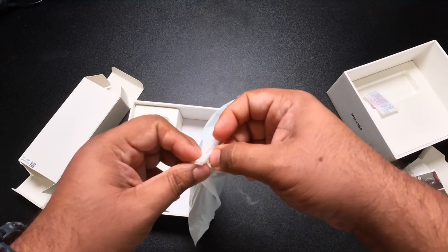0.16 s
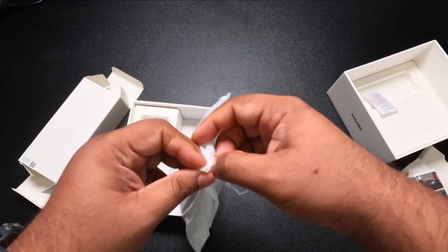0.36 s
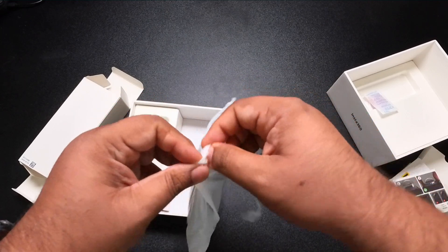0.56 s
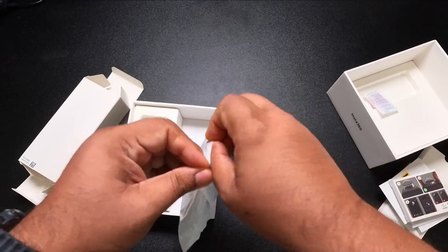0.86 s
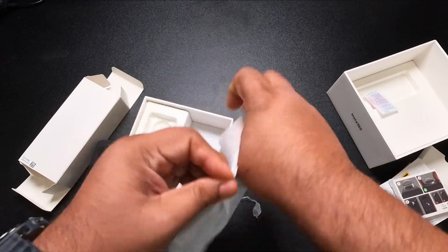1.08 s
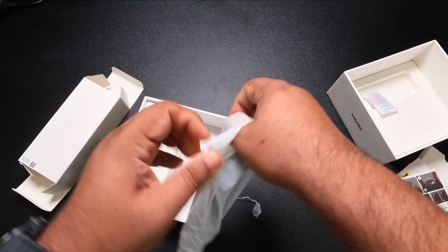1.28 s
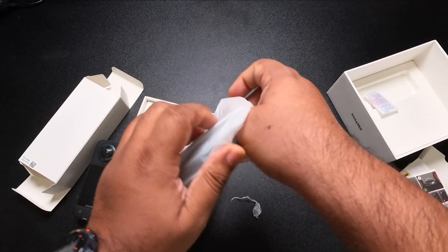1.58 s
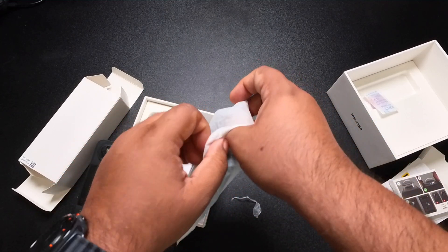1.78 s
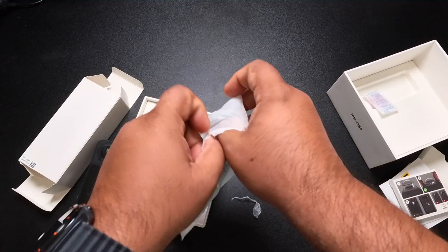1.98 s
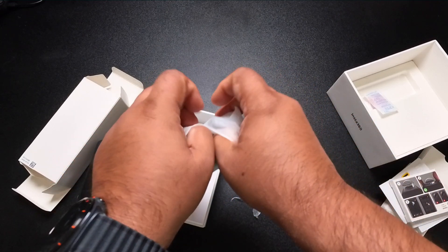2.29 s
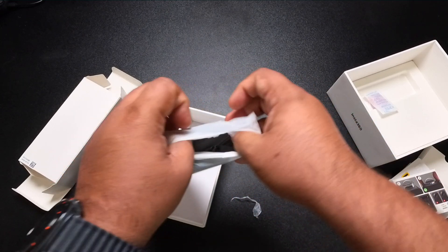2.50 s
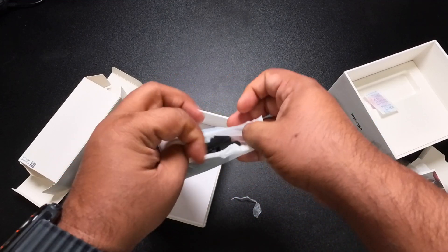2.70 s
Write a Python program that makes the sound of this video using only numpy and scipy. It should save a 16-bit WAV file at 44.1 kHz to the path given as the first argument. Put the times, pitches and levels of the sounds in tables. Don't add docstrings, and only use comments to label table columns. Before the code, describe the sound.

A thin plastic bag crackles softly in irregular picks, rips with a sudden sharp burst, then rustles and snaps as hands pull it open over a desk; close stereo microphones in a quiet room with faint low rumble.

```python
import sys
import numpy as np
from scipy import signal
from scipy.fft import rfft, irfft, next_fast_len
from scipy.io import wavfile

SR = 44100
rng = np.random.default_rng(int(sys.argv[2]) if len(sys.argv) > 2 else 0)


def level_to_linear(level):
    exponent = np.asarray(level, float) / 20
    return 10 ** exponent


def dump(signal):
    limited = np.clip(np.atleast_2d(signal).T, -1, 1)
    pcm = np.round(limited * 32767).astype(np.int16)
    wavfile.write(sys.argv[1], SR, pcm)


N = 125685

# (frequency [Hz], level per Hz [dB])
ROOM_SPECTRUM = [(12, 6.5), (20, 2), (55, -6.5), (80, -13), (129, -10.5), (178, -18.5), (373, -15.5),
                 (677, -31.5), (1500, -19), (1950, -109), (3300, -120)]
# (start [s], length [s], level [dB], pouch fullness [dB], crispness [dB])
FINGER_STROKES = [(0.0, 0.012, -46.5, -17, -4), (0.022, 0.051, -50.5, -17.5, 0.5),
                  (0.081, 0.046, -46.5, -21, -2.5), (0.133, 0.072, -53.5, -15.5, 1),
                  (0.264, 0.03, -54, -24, -4), (0.294, 0.036, -44.5, -15, -1),
                  (0.352, 0.022, -56.5, -8, 2), (0.395, 0.073, -47.5, -14.5, -2.5),
                  (0.456, 0.051, -54, 8.5, -3), (0.486, 0.045, -49.5, -17, -5),
                  (0.546, 0.02, -41, -11.5, -2.5), (0.563, 0.042, -39, -15, -7),
                  (0.635, 0.051, -56, -3, 3), (0.704, 0.026, -46, -20, -2.5),
                  (0.732, 0.042, -41.5, -26, 1), (0.774, 0.027, -46, -23, -2),
                  (0.814, 0.051, -51.5, -33, 3.5), (0.9, 0.05, -49, -32, -6),
                  (0.946, 0.02, -38.5, -18, -7), (0.964, 0.039, -37, -18.5, -2.5),
                  (1.004, 0.12, -40.5, -28.5, -3.5), (1.129, 0.057, -43, -19, -1.5),
                  (1.169, 0.02, -40, -15, -4), (1.19, 0.025, -26, -13.5, -5),
                  (1.214, 0.019, -29, -12, -1.5), (1.225, 0.032, -30.5, -17.5, -5.5),
                  (1.254, 0.066, -40, -10, -5), (1.325, 0.043, -48.5, -11, -9),
                   (1.346, 0.033, -48, -8.5, -6), (1.389, 0.063, -38.5, -15.5, -7.5),
                   (1.431, 0.081, -39.5, -11, 2), (1.508, 0.064, -45, -21, -5),
                   (1.582, 0.061, -48.5, -10, -1), (1.647, 0.044, -42, -19, -4),
                   (1.68, 0.053, -37.5, -15.5, -7), (1.735, 0.047, -43.5, -15, 2.5),
                   (1.785, 0.034, -44, -15, -3), (1.82, 0.043, -41, -20, -4),
                   (1.865, 0.036, -39, -9.5, -2.5), (1.9, 0.021, -41, -10, -7),
                   (1.922, 0.024, -46, -10, -10), (1.947, 0.045, -43.5, -17, -3),
                   (1.995, 0.066, -41.5, -20, -3.5), (2.06, 0.016, -46, -13, -19),
                   (2.074, 0.068, -44.5, -16, -1), (2.14, 0.021, -55.5, -10, 5),
                   (2.165, 0.048, -41, -12.5, -7.5), (2.208, 0.059, -50.5, -15, -7),
                   (2.258, 0.11, -43.5, -11.5, -1.5), (2.34, 0.015, -40, -7, -1),
                   (2.358, 0.088, -42, -12, -5), (2.418, 0.0079, -34, -10.5, -11),
                   (2.44, 0.14, -43, -11.5, -4.5), (2.52, 0.02, -35, -10, -5),
                   (2.551, 0.053, -29, -17.5, -7), (2.605, 0.072, -37.5, -13, -5.5),
                   (2.66, 0.036, -33.5, -10, -6), (2.697, 0.046, -33, -11.5, -5.5),
                   (2.745, 0.054, -48.5, -7, -1.5), (2.8, 0.085, -46.5, -8.5, -0.5)]
# (frequency [Hz], level [dB])
FILM_SPECTRUM = [(200, -24), (380, 1), (650, -11.5), (1200, -2.5), (2300, -1.5), (6000, -5), (12400, -15),
                 (15500, -43)]
# (time [s], peak level [dB], pitch
# [Hz])
CREASE_SNAPS = [(0.0209, -31.5, 5700), (0.063, -34, 3280), (0.0834, -36.5, 2240), (0.2148, -34, 7800),
                (0.2318, -39, 2970), (0.3036, -27, 7500), (0.318, -36, 6100), (0.3463, -25, 7460),
                (0.4445, -31.5, 7400), (0.4796, -36, 1450), (0.6452, -34.5, 3530), (0.6645, -36, 2080),
                (0.6796, -36.5, 2900), (0.6926, -31, 6170), (0.7106, -28, 3880), (0.7483, -21, 7450),
                (0.829, -41, 7000), (0.8395, -36, 5200), (0.8906, -41, 2350), (0.9136, -27, 2530),
                (0.9731, -26.5, 2110), (0.9781, -25.5, 2170), (1.068, -30, 4630), (1.0944, -29.5, 1860),
                (1.1921, -17, 1900), (1.23, -20.5, 2280), (1.3559, -30, 4400), (1.3928, -38, 6300),
              (1.4033, -29, 6600), (1.419, -21.5, 6600), (1.4687, -23, 3080), (1.479, -23.5, 2480),
              (1.5921, -32, 3870), (1.6112, -31, 6960), (1.946, -30, 6200), (2.072, -34.5, 2480),
              (2.1997, -29, 2390), (2.2595, -34, 4240), (2.3051, -26.5, 7650), (2.3455, -25.5, 2060),
              (2.4177, -23, 3300), (2.4305, -33, 3560), (2.5194, -32, 1780), (2.529, -22, 5140),
              (2.554, -40, 2750), (2.626, -25, 1980), (2.6414, -29, 2160), (2.667, -25, 2040)]
# (time [s], peak level [dB], pitch [Hz], ring [cycles])
KNOCKS = [
    (0.8527, -16.5, 5450, 4.7),
    (1.193, -41.5, 118, 3.7),
    (2.2797, -33.5, 1175, 8.4),
    (2.4186, -29.5, 573, 0.97),
    (1.386, -38, 6500, 22),
    (1.394, -29.5, 6500, 36),
    (1.41, -26, 7040, 30),
    (2.2005, -34, 2330, 8.8),
    (2.347, -32, 2230, 11.5),
]
# (time [s], peak level [dB], centre frequency [Hz])
TICKS = [(0.0558, -31, 7430), (0.1154, -39, 4430), (0.16, -33, 8010), (0.1994, -32, 5960),
         (0.2688, -43, 5790), (0.2868, -29, 7620), (0.3272, -26, 7800), (0.392, -37, 8350),
         (0.404, -35, 3070), (0.4249, -27, 5810), (0.4798, -23, 5570), (0.5234, -34, 7640),
         (0.541, -29, 7200), (0.7304, -23, 7960), (0.7622, -24, 7940), (0.7744, -32, 6370),
         (0.8145, -40, 4720), (0.9025, -27.5, 3320), (0.9398, -36, 6020), (0.9824, -27, 6400),
         (1.145, -32, 3140), (1.325, -38, 3490), (1.5494, -33, 8960), (1.5702, -28, 3960),
         (1.646, -34, 3870), (1.695, -35, 3180), (1.7204, -30, 3140), (1.7354, -28, 5830), (1.8, -34, 5330),
         (1.8208, -36, 5310), (1.8327, -22, 7150), (1.877, -26, 6010), (1.917, -26.5, 3230),
         (1.947, -27.5, 6120), (1.969, -26, 5860), (1.986, -25, 6930), (2.0544, -41, 7530),
         (2.0737, -27, 7260), (2.0814, -27, 7220), (2.4654, -32, 6390), (2.588, -22, 5220),
         (2.5956, -34, 5230), (2.6244, -23, 4470), (2.641, -13.5, 5240), (2.6663, -20, 4160)]
# (frequency [Hz], level [dB])
LEFT_OVER_RIGHT = [(200, 0.5), (950, -1), (3770, -2.5), (9000, -4.5), (14000, -5.5)]

ROOM_DB, ROOM_SIDE_DB = -52.5, -6.5
RUMBLE_HZ, RUMBLE_WAVER_DB, RUMBLE_DB = 31.3, 4, -57
HUM_HZ, HUM_WIDTH_HZ, HUM_DB = 118.2, 4.8, -68.5

STROKE_DB, ATTACK_S, RELEASE_S = -2.58, .011, .014
MEAN_FULL_DB, MEAN_CRISP_DB = -11, -8.5
IDLE_DB, LOOSE_FULL_DB, LOOSE_CRISP_DB = -58.5, -31, -8
SAG_DB, IDLE_GROWTH_DB_PER_S = 2.0, 4.0

BUCKLES_PER_S, SIZE_SPREAD_DB, BUCKLE_CYCLES = 11000, 1, 8.5
CLUMP_DB, PATCH_DB = 1.04, 1.86
CREASES_PER_S, CREASE_DB = 90, -5.0

SNAP_DB, SNAP_CYCLES = 1.0, 4.5
RATTLE_DB, RATTLE_T60_S, RATTLE_BREADTH = -7.0, .02, .6
TICK_DB, TICK_CYCLES, TICK_EDGE_HZ = -2.0, 2.5, 11000
TICK_TAIL_DB, TICK_TAIL_S = -10, .007

PLACES = 4
LEFT_LAG_S, LAG_SPREAD_S, PAN_SPREAD_DB = 3.4e-5, 3.5e-5, 2.5
DESK_S, DESK_DB = .0027, -12.0
SCATTER_T60_S, SCATTER_DB, SCATTER_HZ = .03, -12.0, 2500
MIC_TOP_HZ = 16400


def rms_one(x):
    return x / np.sqrt(np.mean(x ** 2) + 1e-20)


def at_hz(points, hz):
    table_hz, table_db = np.array(points).T
    return np.interp(np.log(hz), np.log(table_hz), table_db)


def drift(rate):
    r = np.exp(-16 * np.pi * rate / SR)
    noise = rng.standard_normal(N // 8 + 2002)
    slow = signal.lfilter([1], [1, -2 * r, r * r], noise)[2000:]
    return np.interp(np.arange(N) / 8, np.arange(len(slow)), rms_one(slow))


def shaped(x, response):
    size = next_fast_len(N + 4096)
    hz = np.maximum(np.fft.rfftfreq(size, 1 / SR), 1)
    return irfft(rfft(x, size) * response(hz), size)[..., :N]


def room():
    side = np.array([[1], [-1]])
    air = rms_one(shaped(rng.standard_normal((2, N)), lambda hz: level_to_linear(at_hz(ROOM_SPECTRUM, hz))))
    floor = level_to_linear(ROOM_DB) * (air[0] + level_to_linear(ROOM_SIDE_DB) * air[1] * side)

    turns = np.cumsum(RUMBLE_HZ * (1 + 0.068 * drift(2.8))) / SR
    rumble = level_to_linear(RUMBLE_DB + 3 + RUMBLE_WAVER_DB * drift(3)) * np.sin(2 * np.pi * turns)

    hum = shaped(rng.standard_normal((2, N)), lambda hz: 1 / (1 + (2 * (hz - HUM_HZ) / HUM_WIDTH_HZ) ** 2))
    hum = level_to_linear(HUM_DB) * rms_one(hum[0] + level_to_linear(ROOM_SIDE_DB) * hum[1] * side)
    return floor + rumble + hum


def ring(clicks, hz, t60):
    r, w = level_to_linear(-60 / (t60 * SR)), 2 * np.pi * hz / SR
    return signal.lfilter([.5, 0, -.5], [1, -2 * r * np.cos(w), r * r], clicks + 1e-18)


def effort():
    t = np.arange(N) / SR
    power = np.zeros((3, N))
    idle = (-1, 5, IDLE_DB, LOOSE_FULL_DB, LOOSE_CRISP_DB)
    for s, length, db, full_db, crisp_db in [idle] + FINGER_STROKES:
        rise, fall = (t - s) / ATTACK_S + .5, (s + length - t) / RELEASE_S + .5
        shape = np.clip(np.minimum(rise, fall), 0, 1)
        colour_db = np.array([[full_db - MEAN_FULL_DB], [0], [crisp_db - MEAN_CRISP_DB]])
        colour = level_to_linear(db + STROKE_DB + colour_db)
        if s < 0:
            slope_db = IDLE_GROWTH_DB_PER_S * (t - 1)
        else:
            slope_db = SAG_DB * np.clip(.5 - (t - s) / length, -1, 1)
        power = power + (colour * level_to_linear(slope_db)) ** 2 * shape ** 2 * (3 - 2 * shape)
    return np.log(power) / 2


def crackle():
    low, middle, high = effort()
    sizes = level_to_linear(SIZE_SPREAD_DB * np.minimum(rng.exponential(1, N), 5)) * rng.choice([-1, 1], N)
    here = rng.integers(0, PLACES, N) == np.arange(PLACES)[:, None]
    born = (rng.random(N) < BUCKLES_PER_S / SR) * here

    folded = rng.random(N) < CREASES_PER_S / BUCKLES_PER_S
    creases = level_to_linear(CREASE_DB) * np.exp((middle.mean() - middle) / 3) * folded

    pitches = np.geomspace(250, 15000, 30)
    share = np.cumsum(np.sqrt(pitches)) / np.sum(np.sqrt(pitches))
    dealt = np.searchsorted(share, rng.random(N))
    clump = drift(45)
    lean_hz = np.log([300, 550, 1200, 2200, 4000, 9000])
    out = 0
    for k, hz in enumerate(pitches):
        lean = np.interp(np.log(hz), lean_hz, [-.5, -1, -1, 0, 0, 1])
        gain = np.exp(middle + abs(lean) * ((high if lean > 0 else low) - middle))
        struck = (dealt == k) + creases * rng.standard_normal(N)
        clicks = sizes * born * struck * level_to_linear(CLUMP_DB * clump + PATCH_DB * drift(25))
        t60 = BUCKLE_CYCLES / hz
        scale = np.sqrt(np.mean(ring(clicks.sum(axis=0), hz, t60) ** 2))
        level = level_to_linear(at_hz(FILM_SPECTRUM, hz)) * np.sqrt(hz) / scale
        out = out + level * ring(clicks * gain, hz, t60)
    return out / np.sqrt(np.sum(level_to_linear(2 * at_hz(FILM_SPECTRUM, pitches)) * pitches))


def thin(x, hz):
    return signal.sosfilt(signal.butter(2, hz / 3, "high", fs=SR, output="sos"), x)


def snaps():
    out, t = np.zeros((PLACES, N + 4096)), np.arange(4096) / SR
    creases = [(s, db, hz, SNAP_CYCLES) for s, db, hz in CREASE_SNAPS]
    for k, (s, db, hz, cycles) in enumerate(creases + KNOCKS):
        pluck = np.sin(2 * np.pi * hz * t) * t * level_to_linear(-60 * t * hz / cycles)
        flip = pluck / np.abs(pluck).max()
        if k < len(creases):
            noise = rng.standard_normal(len(t))
            flutter = level_to_linear(4 * rng.standard_normal(len(t) // 32).repeat(32))
            broad = rms_one(ring(noise, 5000, .0004)) * flutter
            rattle = rms_one(ring(noise, hz, 10 / hz)) + RATTLE_BREADTH * broad
            flip = flip + rattle * level_to_linear(RATTLE_DB - 60 * t / RATTLE_T60_S)
        flip = thin(flip, hz)
        i = int((s + .0012) * SR)
        out[k % PLACES, i:i + len(t)] += level_to_linear(db + SNAP_DB) * flip / np.abs(flip).max()
    return out[:, :N]


def ticks():
    out, t = np.zeros((PLACES, N + 1024)), np.arange(1024) / SR
    for k, (s, db, hz) in enumerate(TICKS):
        fizz = level_to_linear(TICK_TAIL_DB - 60 * t / TICK_TAIL_S) * rng.standard_normal(len(t))
        kick = (t == 0) + fizz
        body = ring(kick, hz, TICK_CYCLES / hz)
        edge = ring(kick, TICK_EDGE_HZ, TICK_CYCLES / TICK_EDGE_HZ)
        click = thin(body + edge, hz)
        i = int((s + .0008) * SR)
        out[k % PLACES, i:i + len(t)] += level_to_linear(db + TICK_DB) * click / np.abs(click).max()
    return out[:, :N]


def desk(x):
    def ears(hz, place):
        side = np.array([[1], [-1]])
        lean_db = at_hz(LEFT_OVER_RIGHT, hz) - PAN_SPREAD_DB * place
        lag = LEFT_LAG_S + LAG_SPREAD_S * place
        direct = level_to_linear(side * lean_db / 2) * np.exp(-1j * np.pi * hz * lag * side)

        echo_s = DESK_S * (1 + .15 * place + .02 * side)
        echo = 1 + level_to_linear(DESK_DB) * np.exp(-2j * np.pi * hz * echo_s)

        t = np.arange(2048) / SR
        tail = rng.standard_normal((2, 2048)) * level_to_linear(-60 * t / SCATTER_T60_S) * (t > .001)
        tail = tail / np.sqrt(np.sum(tail ** 2, axis=1, keepdims=True))
        small_things = 1j * hz / (SCATTER_HZ + 1j * hz)
        scatter = level_to_linear(SCATTER_DB) * rfft(tail, 2 * (len(hz) - 1)) * small_things
        return direct * (echo + scatter)

    places = np.linspace(-1, 1, PLACES)
    return sum(shaped(row, lambda hz: ears(hz, place)) for row, place in zip(x, places))


def scene():
    return room() + desk(crackle() + snaps() + ticks())


def band_limit(x):
    return signal.sosfilt(signal.butter(12, 15800, fs=SR, output="sos"), x)


def record(dry):
    mix = signal.sosfilt(signal.butter(16, MIC_TOP_HZ, fs=SR, output="sos"), dry)
    return band_limit(mix)


dry = scene()
out = record(dry)
dump(out)
```